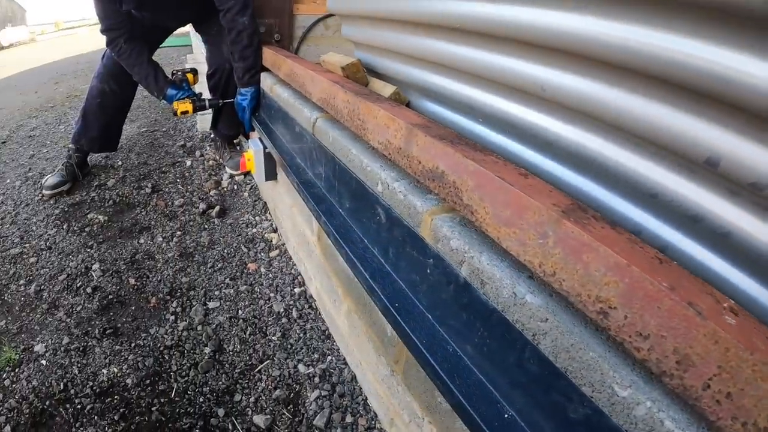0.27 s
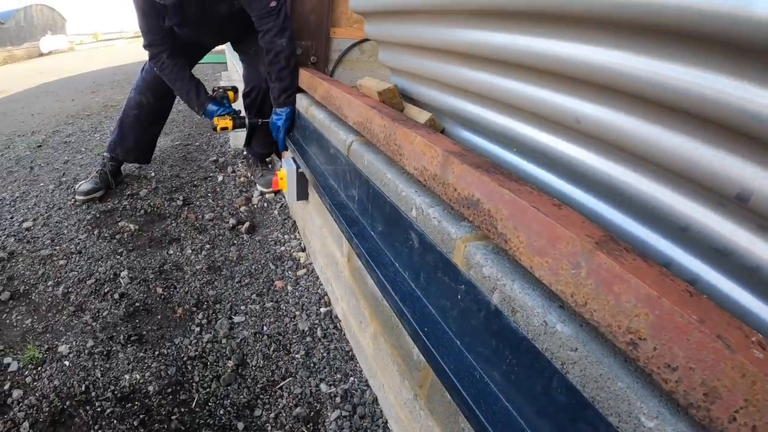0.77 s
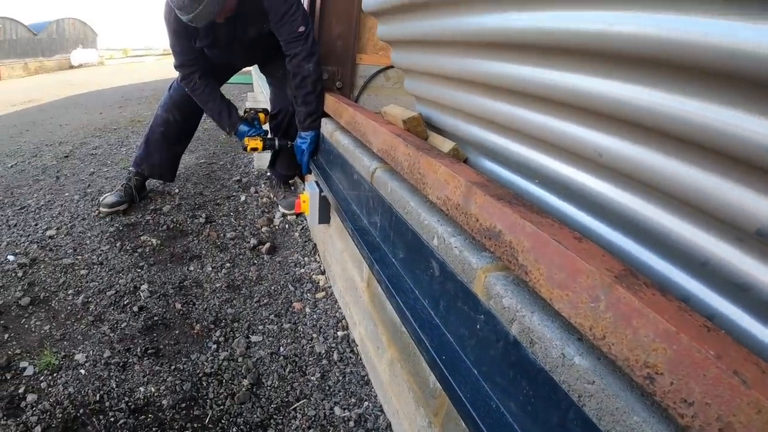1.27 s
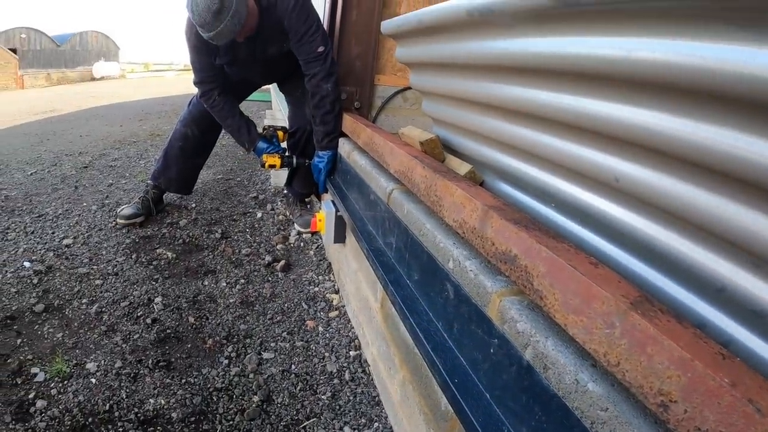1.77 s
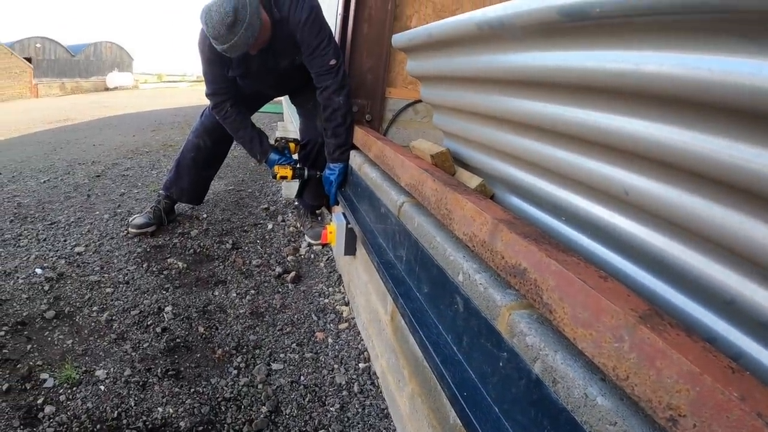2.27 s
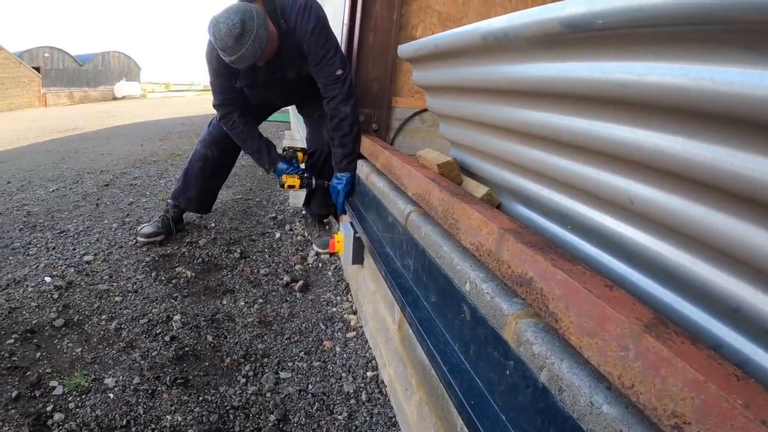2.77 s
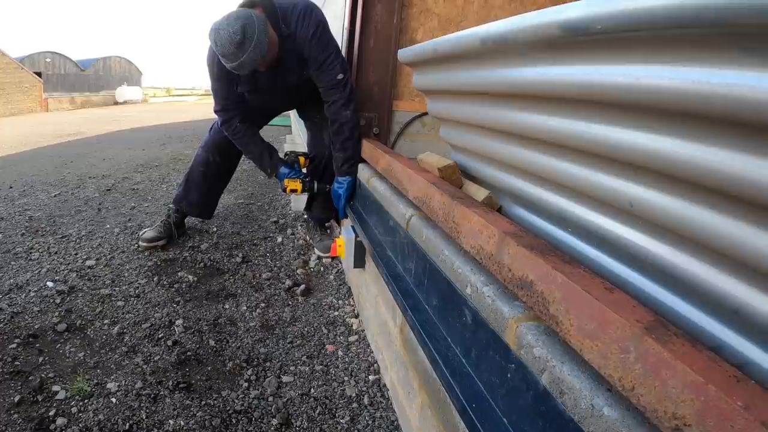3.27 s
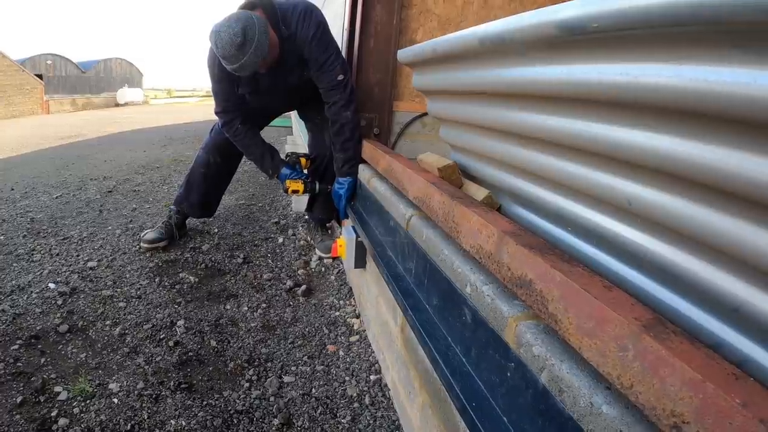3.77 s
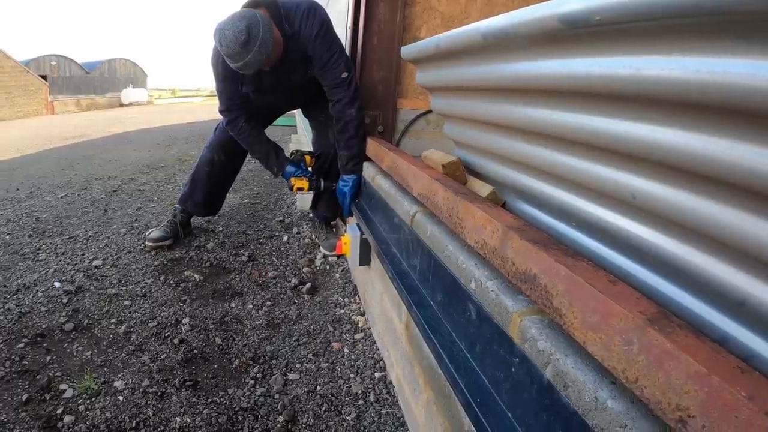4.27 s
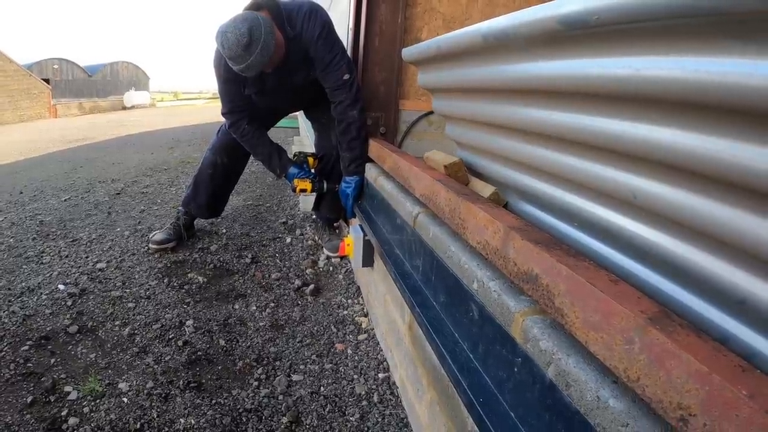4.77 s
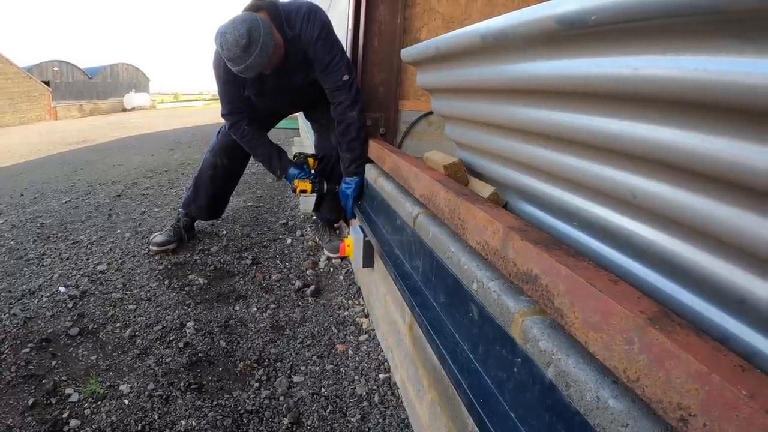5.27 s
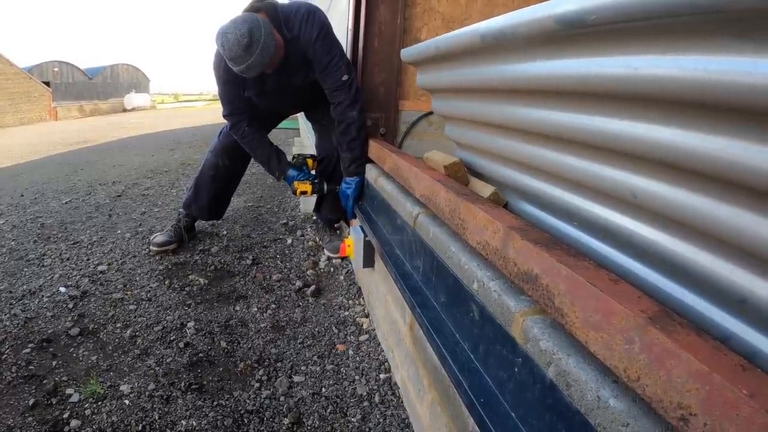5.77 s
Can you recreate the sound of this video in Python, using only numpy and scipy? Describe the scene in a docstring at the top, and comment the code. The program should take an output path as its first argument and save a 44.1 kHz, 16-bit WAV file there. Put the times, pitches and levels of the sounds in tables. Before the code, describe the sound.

In an open yard, wind bumps the microphone while boots crunch on gravel and a switch clicks. A few metres away, a cordless hammer drill starts on a concrete block wall. The loose bit knocks and rattles, then bites into a steady, gritty hammering buzz, its pitch sagging slightly under load. The drill stops for an instant and spins up again unloaded, with a rising whine.

```python
"""In an open yard, wind buffets the microphones while boots and a tool scrape and click. At 1 s a cordless
hammer drill starts on a concrete block wall a few metres away. The loose bit rattles, then bites: a
17-tooth ratchet hammers it, grit grinds, gears whine and a metal sheet nearby rings along. At 5.5 s the
trigger is let go; a moment later the drill spins up again, unloaded, to pull out."""
import sys
import numpy as np
from scipy import signal
from scipy.fft import rfft, irfft, next_fast_len
from scipy.io import wavfile

SR = 44100
rng = np.random.default_rng(int(sys.argv[2]) if len(sys.argv) > 2 else 0)


def dump(signal):
    """Clip the signal to [-1, 1] and save it as 16-bit WAV at the path in sys.argv[1]."""
    limited = np.clip(np.atleast_2d(signal).T, -1, 1)
    pcm = np.round(limited * 32767).astype(np.int16)
    wavfile.write(sys.argv[1], SR, pcm)


N = 266364
t = np.arange(N) / SR

# Tempo of the hammering: t/s, blow rate/Hz
BLOW_RATE = [(1.04, 230), (1.12, 320), (1.145, 332), (1.18, 374), (1.22, 400.2), (1.27, 418.8),
             (1.33, 425.8), (1.65, 429.3), (1.8, 427.1), (2.1, 417.3), (2.25, 417.6), (2.4, 411.4),
             (2.85, 407.5), (3.0, 403), (3.3, 404.1), (3.45, 398), (3.6, 397.3), (3.8, 403.5),
             (4.05, 403.2), (4.25, 398.5), (4.6, 400), (4.8, 405), (5.1, 401), (5.25, 394.3), (5.4, 391.9)]
TEETH = 17


def ratchet():
    """Each tooth strikes and crushes grit; gives the blow count, load, drive and a second grit layer."""
    blows = np.cumsum(curves(BLOW_RATE)[0] * (1 + .0022 * drift(15))) / SR
    turn = 2 * np.pi * blows / TEETH
    load = 1 + 0.07 * np.cos(2 * turn) + 0.06 * np.cos(4 * turn + 3.4)   # two cutting edges
    load += 0.009 * np.cos(turn)
    tooth = amp(1.2 * rng.standard_normal(TEETH))[blows.astype(int) % TEETH]   # each has its own bite
    strikes = np.diff(np.floor(blows), prepend=0) * tooth * amp(5.1 * np.clip(noise(), -2, 2))
    burst = load * amp(0.22 * drift(46)) * (.5 + 0.3 * tooth * np.exp(-4 * (blows % 1)))
    grit, side_grit = (unit(burst * (noise() + 0.25 * unit(grains(3000, 2.88)))) for _ in range(2))
    drive = 0.15 * unit(load * strikes) + .25 * tooth_pattern(blows) + grit
    return blows, load, drive, side_grit


def tooth_pattern(blows, memory=.9, edge_sway=.7):
    """Strong and weak teeth make a groove that comes round every turn and slowly changes."""
    count = blows.astype(int)
    chance = rng.standard_normal((count[-1] // TEETH + 31, TEETH))
    bite = signal.lfilter([1], [1, -memory], chance, axis=0)[30:]
    bite = unit((bite - np.roll(bite, 1, axis=1)).ravel())[count]
    edges = edge_sway * np.sqrt(2) * np.cos(4 * np.pi * count / TEETH)
    clicks = np.diff(count, prepend=0) * (bite + edges)
    return unit(signal.sosfilt(butter(2, 2600), clicks))


START_S, EASE_S, LET_GO_S, STOP_S, HOLD_DB = 1.055, 5.42, 5.525, 5.64, -28


def drill_envelope():
    """Quick attack, hold, easing off and release: level in dB, and gate."""
    level_db = HOLD_DB - 8 * np.exp(-since(START_S) / 0.08)
    level_db -= 48 * since(EASE_S) + 341 * since(LET_GO_S)
    return level_db, curves([(START_S,), (STOP_S,)], fade=0.0075)[0]


# Ring of bit and chuck: f/Hz, width/Hz, level/dB
BIT_MODES = [(1020, 75, 7), (1159, 87, 2), (1435, 90, 8), (1650, 53, 4.5), (1923, 50, -1), (2384, 200, 8.5),
             (2740, 195, 3), (3087, 150, -2), (3690, 690, 5.5), (4170, 670, 6), (4780, 810, 4)]
# Tone colour of the grinding, with a narrow dip near 7.2 kHz: f/Hz, level/dB
GRIND_EQ = [(120, -28), (250, -19), (330, -19), (450, -11), (600, -13), (720, -18), (900, -14.5),
            (1780, -12), (4150, -17.3), (5500, -22.5), (6700, -21.5), (7170, -56), (7600, -20.5),
            (9450, -27), (12200, -36.5), (16000, -70)]
RATCHET_GRIPS_S = 1.118


def grind(drive, gain, bite_db):
    """Blows and grit ring the bit and chuck; each mode swells and fades as the bit's grip shifts."""
    ring = sum(amp(1.8 * drift(9)) * resonances(drive, [mode]) for mode in BIT_MODES)
    out = amp(1) * gain * colour(drive + ring, GRIND_EQ)
    # The low end is faint until the ratchet grips, then rides the thump.
    idle_db = -18 * np.clip((RATCHET_GRIPS_S - t) / 0.0062, 0, 1)
    out += (amp(0.32 * bite_db + idle_db) - 1) * signal.sosfiltfilt(butter(2, 1020), out)
    shallow_db = np.exp(-since(START_S) / 3.1)   # a shallow hole lets more treble out
    return out + (amp(shallow_db) - 1) * signal.sosfiltfilt(butter(2, 3040, "high"), out)


# Body of the hammering: t/s, level/dB at 1, 2 and 3 times the blow rate, thump level/dB
HUM_LEVELS = [(1.045, -58, -52, -58, -38), (1.112, -65, -56, -56.5, -44), (1.124, -31, -40, -42, -28),
              (1.142, -41, -37, -35, -29), (1.168, -33, -48, -41, -34), (1.205, -34.5, -42, -46, -35),
              (1.25, -37.5, -41, -45, -37.5), (1.4, -35, -44, -47, -38.5), (1.6, -30, -37, -56, -35.5),
              (1.85, -29.5, -42.5, -56, -31.5), (2.0, -34.5, -40.5, -47.5, -31.5),
              (2.28, -29, -37, -46.5, -33), (2.45, -38, -34, -53, -33), (2.7, -28, -38, -53, -32.5),
              (3.0, -29.5, -29.5, -44, -31), (3.3, -31, -32, -39.5, -35), (3.55, -27, -36.5, -34, -45),
              (3.75, -30.5, -33, -45, -35), (4.1, -29, -32.5, -45, -36), (4.35, -31.5, -43.5, -45, -33),
              (4.65, -28, -31, -40, -38.5), (4.8, -31, -33.5, -47.5, -40), (4.92, -27.5, -31, -40, -37.5),
              (5.15, -28.5, -31.5, -43, -35.5), (5.28, -27.5, -45, -42, -37),
              (5.42, -29.5, -45.5, -38, -39), (5.5, -41.5, -41, -51, -28), (5.64, -45.5, -69, -63.5, -56)]
# Overtones: multiple of the blow rate, level/dB
OVERTONES = [(4, -46.5), (6, -47.5), (7, -50.5)]


def hum(blows, tone_dbs, drill_db, bite_db):
    """The blows fuse into a buzz; its overtones grow as the hole deepens and as the thump sinks."""
    phase = 2 * np.pi * blows
    out = sum(amp(db + 2 * drift(6)) * np.sin(k * phase) for k, db in enumerate(tone_dbs, 1))
    upper_db = 2 * (drill_db - HOLD_DB) + 2.5 * (t - 3.3) - 0.46 * bite_db
    for k, db in OVERTONES:
        out += amp(db + upper_db + 3 * drift(5.6)) * np.sin(k * (phase + .15 * drift(33)))
    return np.sqrt(2) * out


# Growl partials: cycles per turn, level/dB
GROWL_TONES = [(11, -17), (13, -20), (15, -17), (19, -9), (21, -13), (23, -15), (25, -17), (27, -19),
               (32, -24), (36, -23)]
# Growl fader: t/s, level/dB
GROWL_LEVEL = [(1.1, -41.5), (1.45, -37.5), (1.6, -28.5), (1.9, -31.5), (2.2, -32), (2.6, -33.5),
               (3.3, -39), (4.2, -31), (5.0, -36.5), (5.45, -38.5), (5.6, -43)]
# Low partials riding the thump: cycles per turn, level/dB
THUMP_TONES = [(5, -14), (9, -13.5)]
# Throb of the two cutting edges: t/s, level/dB at 4, 6 and 8 cycles per turn
EDGE_THROB = [(1.15, -45, -50, -42), (1.31, -44, -46, -50), (1.98, -43, -40, -36.5),
              (2.85, -47, -39, -35.5), (3.07, -43, -40, -47), (3.12, -53, -51, -36), (3.24, -46, -37, -38),
              (3.6, -50, -57, -46.5), (3.71, -50, -43.5, -40), (3.99, -45, -40, -54), (4.07, -41, -55, -45),
              (4.27, -41, -37, -44), (4.46, -38, -45, -36), (4.73, -48, -42, -46), (4.82, -61, -41, -30.5),
              (4.9, -46, -70, -45), (4.93, -48, -50, -50), (5.0, -45, -47, -36), (5.35, -57, -36, -58),
              (5.43, -51, -43, -48), (5.55, -49, -58, -64), (5.6, -59, -53, -57)]


def spindle(blows, load, thump_db):
    """The uneven turn growls, thumps and throbs over a low rumble."""
    def partial(k, db):
        return np.sqrt(2) * amp(db) * np.sin(k * 2 * np.pi * blows / TEETH + k * k)

    growl = sum(partial(k, db + 1.49 * drift(5.1)) for k, db in GROWL_TONES)
    growl *= amp(curves(GROWL_LEVEL)[0])
    thump = amp(thump_db + 2 * drift(10)) * sum(partial(k, db) for k, db in THUMP_TONES)
    throb = sum(partial(k, db - 2) for k, db in zip((4, 6, 8), curves(EDGE_THROB)))
    rumble = unit(resonances(load * noise(), [(100, 96, 2), (134.3, 18, 1), (200.4, 160, -4)]))
    return growl + thump + throb + amp(thump_db - 4.5) * rumble


# Gear stages under load: cycles per blow, level/dB
GEAR_TONES = [(10.14, -17), (11.63, -23), (12.31, -22)]


def gears(blows, drill_db):
    """Meshing teeth whine, receding as the hole deepens."""
    gain = np.sqrt(2) * amp(drill_db + 1.5 - 0.5 * (t - 2.5) + 2 * drift(10))
    return gain * sum(amp(db) * np.sin(2 * np.pi * ratio * blows) for ratio, db in GEAR_TONES)


# Unloaded rev: t/s, mesh f/Hz, mesh level/dB, second mesh level/dB, rush level/dB
REV = [(5.65, 2900, -71.5, -70.5, -62), (5.67, 2920, -70.5, -71, -54), (5.688, 2950, -70.5, -71, -44),
       (5.697, 2960, -70.5, -68.5, -37.5), (5.731, 3040, -65, -60, -37), (5.737, 3090, -55, -33, -33),
       (5.745, 3190, -52, -33, -34), (5.762, 3520, -48, -37, -33), (5.775, 3720, -44, -43, -33),
       (5.79, 3860, -41, -52, -34), (5.808, 3990, -36, -50, -33), (5.84, 4172, -40, -48, -32.5),
       (5.88, 4294, -40, -49, -33), (5.94, 4335, -38, -45, -32), (6.04, 4355, -39, -43, -32)]
# Tone colour of the rush, with a narrow dip near 7.2 kHz: f/Hz, level/dB
RUSH_EQ = [(180, -39), (300, -8), (400, -12), (700, -24), (1000, -8), (1620, -12.5), (2500, -6.5),
           (4360, -1), (5150, -2), (5600, -9.5), (6600, -9.5), (7170, -22), (7700, -12), (10400, -21),
           (12200, -38.5), (16000, -77)]
# Bit brushing the hole: f/Hz, width/Hz, level/dB
SCRAPE_MODES = [(1095, 400, -7), (2520, 580, 1.5), (2990, 630, -3)]
SECOND_MESH_RATIO, MESH_PER_TURN, BRUSH_AT_S = 1.148, 172.4, 6.014


def free_spin():
    """Two gear whines climb over the fan's rush; the free bit brushes the hole once a turn."""
    mesh_hz, mesh_db, second_db, rush_db, gate = curves(REV)
    gain = gate * amp(rush_db)
    phase = 2 * np.pi * np.cumsum(mesh_hz) / SR
    turn = (phase - phase[round(BRUSH_AT_S * SR)]) / MESH_PER_TURN
    brush = amp(-1) * gain * np.exp(3.5 * (np.cos(turn) - 1))
    scrape = brush * unit(resonances(noise() + .4 * unit(grains(2000, 2)), SCRAPE_MODES))
    phase += .4 * drift(80)   # backlash roughens the whine
    whine = np.sin(phase) * amp(mesh_db + 3 * drift(40))
    whine += np.sin(SECOND_MESH_RATIO * phase) * amp(second_db + 3 * drift(40))
    rush = amp(-1) * gain * colour(noise() * amp(1.3 * drift(90)), RUSH_EQ)
    return rush, gain, gate * np.sqrt(2) * whine, scrape


# Hard hits of the loose bit: t/s, level/dB
KNOCK_HITS = [(1.0497, -26), (1.0603, -17), (1.0733, -17), (1.09, -34), (1.198, -22), (1.216, -31),
              (1.239, -27), (1.2892, -23), (1.3252, -21), (1.3635, -28), (1.398, -19.5), (1.439, -24),
              (1.449, -24), (1.456, -23), (1.464, -24), (1.47, -25)]
# Clank of the chuck: f/Hz, level/dB, t60/s
CHUCK_MODES = [(1045.3, -10, 0.03), (1270, -4, 0.035), (1377.1, 2, 0.05), (1455.9, -5, 0.09),
               (1600, -8, .03), (1780, -9, .03), (2150, -11, .025)]


def knocks(contact_s=.0025, crack_t60_s=.015):
    """Short scraping contacts ring the chuck, each with its own mix of modes and a bright crack."""
    times, hit_db = np.transpose(KNOCK_HITS)
    span = round(contact_s * SR)
    crack = sum((t >= s) * amp(db - 13 - 60 * since(s) / crack_t60_s) for s, db in KNOCK_HITS)
    out = crack * colour(noise(), RUSH_EQ)
    for hz, mode_db, t60 in CHUCK_MODES:
        hits = np.full(N, 1e-18)
        hits[(times * SR).astype(int)] = amp(hit_db + mode_db + 3 * rng.standard_normal(len(times)))
        r, w = amp(-60 / (t60 * SR)), 2 * np.pi * hz / SR
        contact = np.hanning(span) * np.cos(w * np.arange(span)) * 4 / span
        force = signal.sosfilt(butter(2, [900, 1900], "band"), np.convolve(hits, contact)[span // 2:][:N])
        out += signal.lfilter([0, np.sin(w)], [1, -2 * r * np.cos(w), r * r], force)
    return out


# Chatter of the loose bit: f/Hz, width/Hz, level/dB
CHATTER_MODES = [(976, 67, -7.5), (1470, 140, -3.5), (2065, 200, -5)]


def rattle(start_s=1.1878, bites_s=1.47):
    """The loose bit chatters unevenly until it bites."""
    gate, = curves([(start_s,), (bites_s,)], fade=0.021)
    return gate * amp(-28 + 2 * drift(10.7)) * unit(resonances(grains(400, 3.35), CHATTER_MODES))


# Whine cues as the speed ramps: t/s, hold/s, level/dB, fade/(dB/s)
TRIGGER_CUES = [(0.955, 0.11, -43, 300), (5.659, 0.0039, -39, 500.5), (5.69, 0.004125, -38, 900)]


def trigger(hz=3890):
    """A thin switching tone with a weak octave: held, then fading."""
    gain = sum(np.clip((t - s) / 0.012, 0, 1) * amp(db - fade * since(s + hold))
               for s, hold, db, fade in TRIGGER_CUES)
    phase = 2 * np.pi * hz * t
    return np.sqrt(2) * gain * (np.sin(phase) + amp(-28) * np.sin(2 * phase))


# Switch and latch clicks: t/s, level/dB, ring f/Hz
SNAP_HITS = [(0.833, -27.5, 1000), (0.852, -27, 2600), (0.9111, -29, 4000), (5.692, -35, 3900),
             (5.7348, -27, 5500)]
# Their EQ: f/Hz, level/dB
SNAP_EQ = [(500, -6), (1000, 12), (2500, 1), (4000, 0), (6800, -13), (11500, -42), (16000, -71)]


def snaps(t60_s=0.022, width_hz=790):
    """Switch and latch snap crisply, each at a pitch of its own."""
    hiss, out = colour(noise(), SNAP_EQ), np.zeros(N)
    for s, db, hz in SNAP_HITS:
        ring = unit(resonances(hiss, [(hz, width_hz, 0)]))
        out += (t >= s) * amp(db - 5.5 - 60 * since(s) / t60_s) * (.6 * hiss + 1.3 * ring)
    return out


# Boot and tool scuffs: t/s, level/dB, brightness/dB
SCUFF_LEVELS = [(0.67, -71.5, -20), (0.682, -42, -31), (0.718, -41, -18.5), (0.78, -27.5, -34),
                (0.798, -42.5, -30), (0.906, -56, -13.5), (0.914, -44, -22.5), (0.966, -63, -15),
                (1.045, -46, -4)]
# EQ of the dull layer: f/Hz, level/dB
DULL_EQ = [(240, -62), (400, -37), (469, -9), (555, -37), (686, -12), (1080, -11), (1510, -1.5),
           (2400, -8.5), (2900, -19.5), (3960, -23), (5000, -23), (6500, -63), (11000, -120)]
# EQ of the bright layer: f/Hz, level/dB
BRIGHT_EQ = [(2350, -24), (4000, -1), (5200, -11), (6300, 1), (7000, -3), (7740, -18), (9020, -14),
             (11000, -28), (14300, -59), (22000, -120)]
# Gravel crunches: t/s, level/dB, brightness/dB, t60/s, ring f/Hz
CRUNCHES = [(0.009, -35.5, -42, 0.058, 1480), (0.109, -41, -30, 0.06, 1550), (0.168, -36, -15, 0.13, 2170),
            (0.244, -41.5, -13, 0.054, 2200), (0.294, -41.5, -18, 0.085, 3280),
            (0.4, -38.5, -34, 0.071, 1500), (0.6, -40.5, -29, 0.06, 1550), (0.684, -39, -27, 0.041, 1800),
            (0.698, -36, -25, .03, 1700), (0.764, -28, -24, 0.026, 1800), (0.778, -27, -26, 0.036, 1720)]


def boots_and_tool(attack_s=.002, width_hz=600):
    """Gritty scuffs, and crunches that ring at the pitch of their stones."""
    level_db, bright_db, gate = curves(SCUFF_LEVELS)
    grit = .6 * noise() + unit(grains(900, 4))
    dull, bright = colour(grit, DULL_EQ), colour(grit, BRIGHT_EQ)
    out = gate * amp(level_db) * (dull + amp(bright_db) * bright)
    for s, db, bright_db, t60, hz in CRUNCHES:
        envelope = (1 - np.exp(-since(s) / attack_s)) * amp(db - 60 * since(s) / t60)
        stone = [(hz, width_hz, 0)]
        ring = unit(resonances(resonances(grit, stone), stone))
        out += envelope * (amp(-6.5) * ring + amp(-9) * dull + amp(bright_db) * bright)
    return out


# Ring of the corrugated sheet: f/Hz, width/Hz, level/dB
SHEET_MODES = [(140.2, 3.4, -5.5), (261, 3.4, 7.5), (437.7, 2.6, 0), (796, 1.3, -1.5), (1140, 1.6, -23)]


def sheet(drill):
    """A corrugated sheet beside the wall picks up the drill and rings on."""
    return amp(4.5) * resonances(drill, SHEET_MODES)


# Slapback off the sheds: delay t/s, level/dB
SLAPBACKS = [(.058, -20), (0.094, -28)]


def echoes(x, t60_s=0.34):
    """The direct sound, dull slaps and a short tail scattered by walls and sheet metal."""
    out, dull = x.copy(), signal.lfilter([.25], [1, -.75], x)
    for s, db in SLAPBACKS:
        lag = round(s * SR)
        out[lag:] += amp(db) * dull[:-lag]
    age = t[:SR // 2]
    tail = rng.standard_normal(len(age)) * amp(-60 * age / t60_s) * (age > .008)
    tail = signal.sosfilt(butter(1, 1200), tail)
    return out + amp(-15) * signal.fftconvolve(x, tail / np.sqrt(np.sum(tail ** 2)))[:N]


# Pan by frequency: f/Hz, share leaning left
PAN = [(3000, -0.025), (6400, 0.077), (7200, 0.79), (7900, -0.89), (9300, -0.21), (10200, 0.049),
       (11800, -0.66)]
# Reflections that differ left and right: f/Hz, level/dB
WIDTH_EQ = [(100, -30), (180, -28), (300, -32), (600, -27), (1200, -19), (2500, -20), (4000, -22),
            (6000, -40)]
# Side EQ of the drill's grit: f/Hz, level/dB
SIDE_GRIT_EQ = [(2500, -47), (3500, -20), (3940, -10), (4500, -33), (5200, -5.5), (6300, 4.5), (7330, 10.5),
                (8200, -3), (9900, -11), (11000, -9), (12200, -23.5), (16000, -57.5)]


def stereo_side(mid, grit, drill_gain, foley, late_s=0.015):
    """Left minus right: panned treble, a late reflection, wide grit and delayed foley."""
    size = next_fast_len(N + 4096)
    hz, width = eq_curve(WIDTH_EQ, size)
    late = width * np.exp(-2j * np.pi * hz * late_s)
    spread = irfft(rfft(mid, size) * (np.interp(hz, *np.transpose(PAN)) + late), size)[:N]
    return spread + amp(-12) * drill_gain * colour(grit, SIDE_GRIT_EQ) + amp(-14) * np.roll(foley, 700)


# EQ of the wind rumble: f/Hz, level/dB
WIND_EQ = [(12, -19.5), (20, 4.5), (67, 4), (119, -8.5), (203, -13), (275, -26), (371, -38), (400, -78),
           (520, -91.5), (880, -120)]
# Breeze fader: t/s, level/dB
BREEZE_LEVEL = [(0, -48), (.7, -41.5), (1.4, -48.5), (2.35, -57), (2.6, -60), (4.3, -72), (5.5, -62),
                (6.04, -43)]
# Gusts: t/s, level/dB, time to fall 12 dB either side/s
GUST_CUES = [(.43, -32, 0.0268), (.57, -38.5, 0.0573), (.66, -42, 0.14), (.82, -26, 0.05), (1.3, -35, 0.17),
             (1.9, -33, 0.03), (2.02, -33, 0.09), (3.7, -35, 0.04), (5.08, -48, 0.04), (5.75, -38, 0.07)]


def wind(correlation=.15):
    """Wind on the microphones: a lumpy rumble with single gusts, partly different at each."""
    gusts = sum(amp(db - 12 * np.abs(t - s) / fall) for s, db, fall in GUST_CUES)
    shared, side = (colour(noise(), WIND_EQ) for _ in range(2))
    gain = gusts + amp(curves(BREEZE_LEVEL)[0] + 3 * drift(3.9))
    return gain * (shared + np.sqrt((1 - correlation) / (1 + correlation)) * side * [[1], [-1]])


# Sub-bass wind hits: t/s, level/dB, f/Hz, share leaning left
WIND_HITS = [(0.545, -20.5, 39.3, 0.74), (0.819, -20, 50.83, 0.32), (3.681, -28, 36, 0.32),
             (3.73, -25.5, 22, 0.28)]


def wind_slaps():
    """Each slap is a pressure dip between two small swells."""
    out = np.zeros((2, N))
    for s, db, hz, left in WIND_HITS:
        cycles = (t - s) * hz
        out -= amp(db) * np.cos(2 * np.pi * cycles) * np.exp(-(1.65 * cycles) ** 2) * [[1 + left], [1 - left]]
    return out


# EQ of the yard ambience: f/Hz, level/dB
YARD_EQ = [(59, -42), (100, 2.5), (228, -1), (290, -6.5), (442, -7.5), (886, -21.5), (1560, -18),
           (6660, -44.5), (8000, -58), (10400, -95), (17600, -120)]


def yard(level_db=-46):
    """A quiet, dark outdoor bed that widens towards the treble."""
    mid, side = (amp(level_db) * colour(noise(), YARD_EQ) for _ in range(2))
    return mid + amp(4.5) * np.diff(side, prepend=0) * [[1], [-1]]


def amp(db):
    """dB to gain."""
    return 10 ** (np.asarray(db) / 20)


def unit(x):
    """Scale to rms 1."""
    return x / np.sqrt(np.mean(x ** 2) + 1e-20)


def since(s):
    """Seconds after a cue, 0 before it."""
    return np.maximum(t - s, 0)


def noise():
    """White noise."""
    return rng.standard_normal(N)


def butter(order, hz, kind="low"):
    """Butterworth filter sections."""
    return signal.butter(order, hz, kind, fs=SR, output="sos")


def curves(rows, fade=0.0036):
    """One automation curve per column, then a gate that is shut outside the table."""
    s, *columns = np.transpose(rows)
    gate = np.clip(np.minimum(t - s[0] + fade, s[-1] + fade - t) / fade, 0, 1)
    return [np.interp(t, s, c) for c in columns] + [gate]


def eq_curve(eq, size):
    """FFT bin frequencies and the EQ's gain at each."""
    hz, level_db = np.transpose(eq)
    grid = np.arange(size // 2 + 1) * SR / size + 1
    return grid, amp(np.interp(np.log(grid), np.log(hz), level_db))


def colour(x, eq):
    """Minimum-phase EQ; output at rms 1."""
    size = next_fast_len(N + 8192)
    cepstrum = irfft(np.log(eq_curve(eq, size)[1]), size)
    cepstrum[1:size // 2] *= 2
    cepstrum[size // 2 + 1:] = 0
    return unit(irfft(rfft(x, size) * np.exp(rfft(cepstrum)), size)[:N])


def resonances(x, modes):
    """Parallel resonators of alternating polarity: f/Hz, width/Hz, level/dB."""
    out = np.zeros(N)
    for k, (hz, width, db) in enumerate(modes):
        r = np.exp(-np.pi * width / SR)
        poles = [1, -2 * r * np.cos(2 * np.pi * hz / SR), r * r]
        out += (-1) ** k * amp(db) * (1 - r * r) / 2 * signal.lfilter([1, 0, -1], poles, x)
    return out


def drift(hz):
    """Smooth random modulation, rms 1."""
    r = np.exp(-2 * np.pi * hz / SR)
    return unit(signal.lfilter([1], [1, -2 * r, r * r], rng.standard_normal(N + SR))[SR:])


def grains(per_s, spread_db):
    """Random clicks of uneven size."""
    hits = rng.random(N) < per_s / SR
    return hits * amp(spread_db * np.minimum(rng.exponential(1, N), 4)) * rng.choice([-1, 1], N)


def scene():
    """Drill and foley in the yard's echoes, spread to stereo over wind and ambience."""
    blows, load, drive, side_grit = ratchet()
    drill_db, gate = drill_envelope()
    grind_gain = gate * amp(drill_db)
    *tone_dbs, thump_db, _ = curves(HUM_LEVELS)
    bite_db = np.clip(thump_db + 37, -6, 6)   # swing of the thump about -37 dB
    tones = hum(blows, tone_dbs, drill_db, bite_db) + spindle(blows, load, thump_db)
    tones = gate * (tones + gears(blows, drill_db))
    grinding = grind(drive, grind_gain, bite_db)
    rush, rush_gain, whine, scrape = free_spin()
    foley = boots_and_tool() + snaps()
    mid = echoes(grinding + rush + scrape + knocks() + rattle() + foley)
    mid += sheet(grinding + rush + 0.604 * tones) + amp(.5) * tones + whine + trigger()
    side = stereo_side(mid, side_grit, grind_gain + rush_gain, foley)
    return mid + side * [[1], [-1]] + wind() + wind_slaps() + yard()


def record(dry):
    """Soft-clip the peaks and cut the top, fully down by 12.6 kHz."""
    return signal.sosfilt(signal.cheby2(16, 70, 12600, fs=SR, output="sos"), .45 * np.tanh(dry / .45))


dry = scene()
out = record(dry)
dump(out)
```